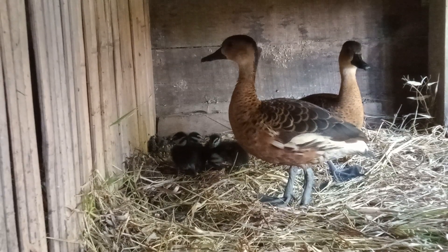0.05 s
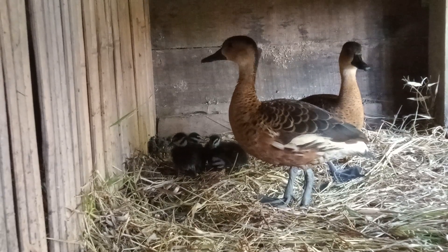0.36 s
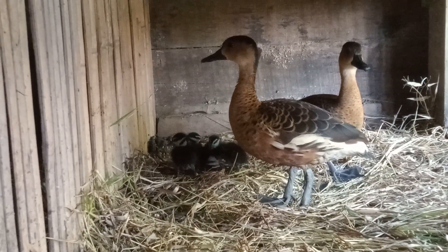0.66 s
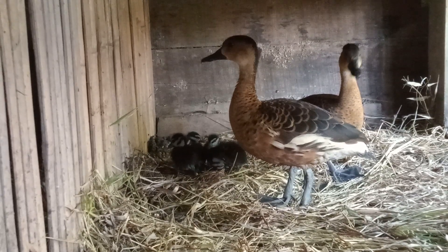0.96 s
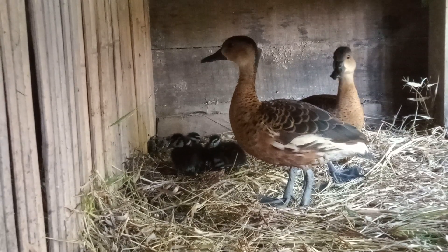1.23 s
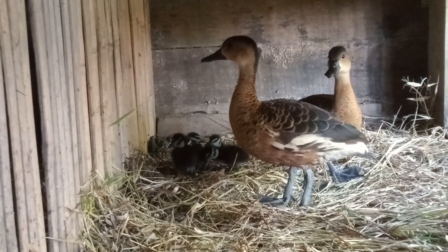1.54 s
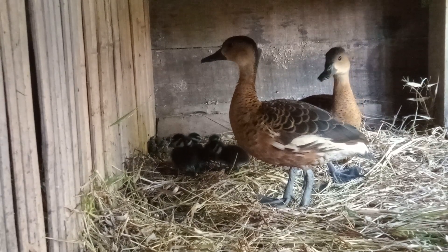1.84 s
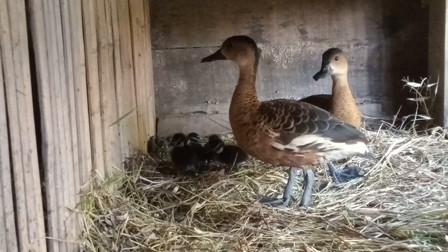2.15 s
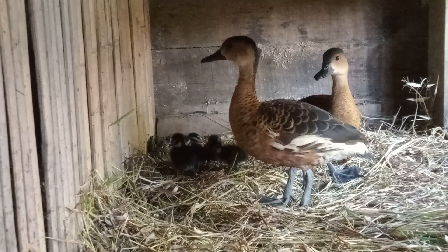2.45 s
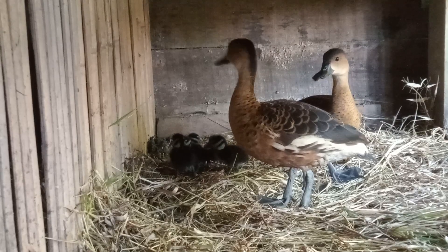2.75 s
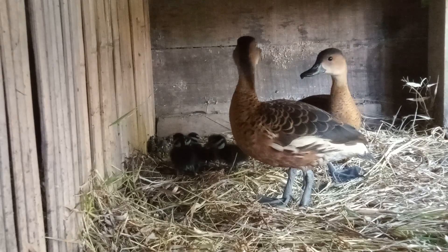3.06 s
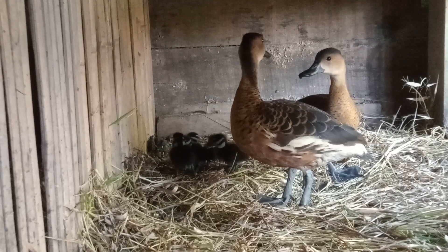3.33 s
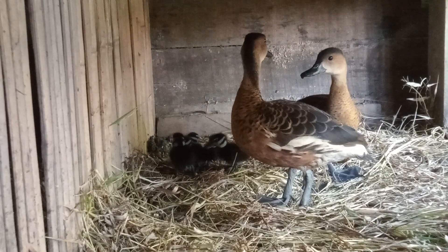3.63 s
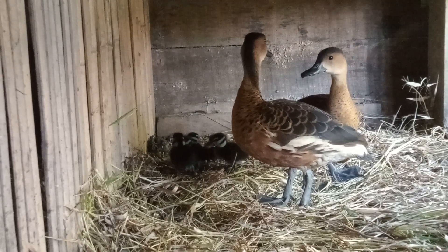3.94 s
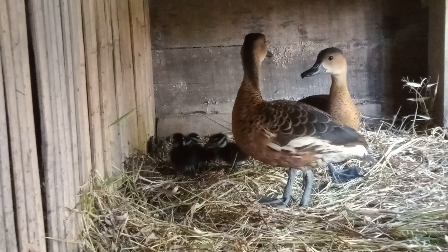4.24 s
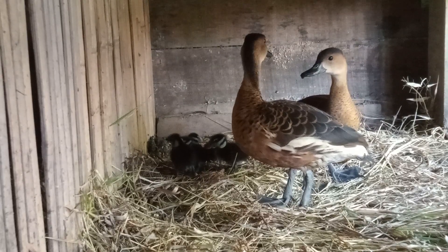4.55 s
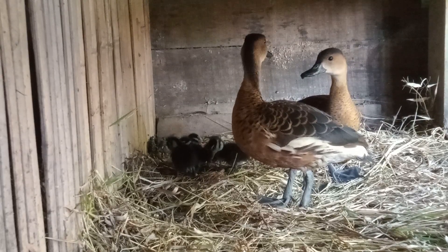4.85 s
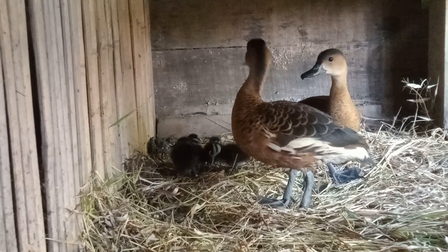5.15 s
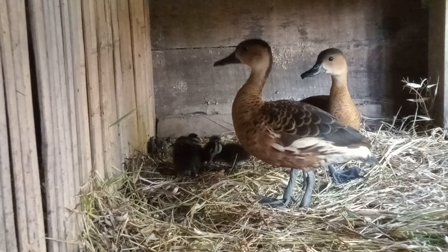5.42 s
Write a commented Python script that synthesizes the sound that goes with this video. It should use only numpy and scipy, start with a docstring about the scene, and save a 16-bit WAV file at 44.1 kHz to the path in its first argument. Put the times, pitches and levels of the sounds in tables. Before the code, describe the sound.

Ducks give short raspy whistles and ducklings peep inside a wooden hutch, with soft knocks on the boards.

```python
"""Whistling ducks call with their ducklings inside a wooden hutch bedded with straw.
Each call is a gliding harmonic tone from the syrinx, roughened by modulation and hiss: short raspy
whistles from the ducks, thin high peeps and bouts of twitter from the ducklings. Reflections from the
plank walls smear them into a ringing tail. Soft knocks excite the modes of the boards; a few low notes,
a far bird's whistles and one close, nearly dry chirp stand over a faint outdoor hush."""
import sys
import numpy as np
from scipy import signal
from scipy.fft import rfft, irfft
from scipy.io import wavfile
from scipy.ndimage import map_coordinates

SR = 44100
rng = np.random.default_rng(int(sys.argv[2]) if len(sys.argv) > 2 else 0)


def generate_wav(sig):
    """Save sig (samples, or channels by samples) to the path in sys.argv[1] as 16-bit PCM at SR."""
    pcm = np.round(np.clip(np.atleast_2d(sig).T, -1, 1) * 32767).astype(np.int16)
    wavfile.write(sys.argv[1], SR, pcm)


N = 250929


def undb(db):
    """Amplitude ratio of a level in decibels."""
    return 10 ** (np.asarray(db) / 20)


def gain_at(hz, spectrum):
    """Gain of a spectrum (frequency_hz, level_db), interpolated on a logarithmic frequency axis."""
    corners_hz, db = np.transpose(spectrum)
    return undb(np.interp(np.log(np.maximum(hz, 1)), np.log(corners_hz), db))


def noise(size, spectrum):
    """Spectral shaping: white noise filtered to a spectrum and scaled to rms 1."""
    white = rfft(rng.standard_normal(size))
    shaped = irfft(white * gain_at(np.fft.rfftfreq(size, 1 / SR), spectrum), size)
    return shaped / np.sqrt(np.mean(shaped ** 2))


def wander(size, rate_hz):
    """Random modulator: a spline through Gaussian values, with a spread near 1."""
    steps = np.arange(size) / SR * rate_hz
    return map_coordinates(rng.standard_normal(int(steps[-1]) + 2), [steps], order=3, mode="nearest")


def add(track, start_s, sound):
    """Superposition: a sound sums into the track from its start time."""
    i = max(int(start_s * SR), 0)
    track[i:i + len(sound)] += sound[:max(N - i, 0)]


def arch(length_s, start_hz, middle_hz, end_hz, edges_s):
    """Parabolic pitch contour and cosine-tapered envelope of one note."""
    progress = np.linspace(0, 1, int(max(length_s, .005) * SR))
    hz = np.polyval(np.polyfit([0, .5, 1], [start_hz, middle_hz, end_hz], 2), progress)
    return hz, np.sqrt(2) * signal.windows.tukey(len(hz), np.clip(edges_s / length_s, 0, 1))


def hush(level_db=-50, waver_db=3.5):
    """Outdoor ambient noise: steady hiss above a rumble under random amplitude modulation."""
    # spectral density of the background: frequency_hz, relative_db
    air_spectrum = [(24, -62), (40, -12.5), (108, 3), (202, -4), (350, -11.5), (449, -8), (621, -14.5),
                    (778, -14), (1310, -21), (2270, -15.5), (3740, -13), (5860, -35.5), (7710, -37),
                    (9650, -26), (15500, -55)]
    air = noise(N, air_spectrum) * undb(level_db)
    rumble = signal.sosfiltfilt(signal.butter(2, 600, fs=SR, output="sos"), air)
    return rumble * undb(waver_db * wander(N, 15)) + (air - rumble)


def knocks(body_db=-4, body_t60_s=0.3, ring_db=-2, ring_t60_s=0.18, boom_db=6.5, boom_rise_s=0.023):
    """Damped vibration: a soft blow excites a hollow note and dense modes; low modes build up later."""
    # blows on the boards: start_s, blow_db, low_modes_db, ring_hz, rise_s
    blows = [(0.19, -30.5, -37, 358, .014), (0.475, -42, -60, 406, 0.0095),
             (0.569, -26.5, -38.5, 555, .018), (0.926, -28.5, -35.5, 451, .012),
             (1.285, -29.5, -40, 324.4, 0.011), (1.726, -31, -39.5, 478, .006),
             (2.05, -32, -45.5, 518, 0.0058), (2.39, -32.5, -46, 399, .006), (2.499, -32.5, -37, 325, .015),
             (2.951, -24, -39, 670, 0.0099), (3.28, -31, -38.5, 448, .012),
             (3.682, -28.5, -38.5, 690, .012), (3.903, -30.5, -46, 415.4, .012),
             (4.057, -34, -41, 433, 0.0076), (4.716, -34, -43, 548, 0.0083),
             (5.045, -29.5, -43, 551, 0.0085)]
    # low modes of the boards: frequency_hz, relative_db, t60_s
    board_modes = [(66, -11, 0.39), (116.5, -6.5, 0.57), (153, -7, 0.34), (216, 0, 0.31)]
    # spectrum of the dense modes: frequency_hz, relative_db
    body_spectrum = [(150, -28), (260, -2.5), (420, -4), (600, -3.5), (850, -8.5), (1250, -14),
                     (3800, -15.5), (6400, -47.5), (9700, -27), (14000, -47)]
    out, t = np.zeros(N), np.arange(SR // 2) / SR
    for start_s, blow_db, low_modes_db, ring_hz, rise_s in blows:
        low_modes = np.zeros(len(t))
        for hz, db, t60_s in board_modes:
            detuned_hz = hz * (1 + 0.0464 * rng.standard_normal())
            low_modes += undb(db - 60 * t / t60_s) * np.sin(2 * np.pi * (detuned_hz * t + rng.random()))
        boom = undb(low_modes_db + boom_db) * (1 - np.exp(-t / boom_rise_s)) * low_modes
        body = noise(len(t), body_spectrum) * undb(body_db - 60 * t / body_t60_s)
        hollow = np.sin(2 * np.pi * ring_hz * t) * undb(ring_db - 60 * t / ring_t60_s)
        blow = undb(blow_db) * (1 - np.exp(-t / rise_s)) * (body + hollow)
        add(out, start_s - rise_s, blow + boom)  # a soft contact begins one rise time early
    return out


def clucks(wobble=0.066, flutter=0.4):
    """Brief low notes that sag in pitch, made unsteady by random frequency and amplitude modulation."""
    # low notes: start_s, pitch_hz, level_db, length_s
    low_notes = [(0.070, 115, -38, 0.083), (0.198, 219.3, -39.5, 0.085), (0.808, 556, -34.5, 0.03),
                 (2.495, 208.4, -38.5, 0.069), (2.621, 468, -49.5, 0.05)]
    out = np.zeros(N)
    for start_s, pitch_hz, level_db, length_s in low_notes:
        hz, swell = arch(length_s, 1.1 * pitch_hz, pitch_hz, 1.07 * pitch_hz, edges_s=length_s / 2)
        hz *= 1 + wobble * wander(len(hz), pitch_hz)
        swell *= 1 + flutter * wander(len(hz), 2 * pitch_hz)
        add(out, start_s, undb(level_db) * swell * np.sin(2 * np.pi * np.cumsum(hz) / SR))
    return out


def far_bird():
    """Pure tones: a bird outside whistles faint, gliding sinusoids."""
    # far whistles: start_s, length_s, start_hz, middle_hz, end_hz, level_db
    whistles = [ (3.15, 0.064, 1190, 1170, 1000, -54.5), (3.234, 0.071, 977, 950, 900, -54),
                (4.440, 0.1, 1555, 1500, 1410, -66), (5.082, 0.21, 1430, 1517, 1560, -60.5), ]
    out = np.zeros(N)
    for start_s, length_s, start_hz, middle_hz, end_hz, level_db in whistles:
        hz, swell = arch(length_s, start_hz, middle_hz, end_hz, edges_s=0.02)
        add(out, start_s, undb(level_db) * swell * np.sin(2 * np.pi * np.cumsum(hz) / SR))
    return out


def chirp(jitter=0.14, hold_s=0.01, rise_db_per_s=1700, fall_db_per_s=800, scoop_db=-24):
    """A harmonic series scoops up softly, is loud at the top and roughens with jitter as it falls."""
    # one sharp chirp close by: start_s, length_s, start_hz, middle_hz, end_hz, level_db
    note = (5.283, .062, 869, 1320, 1004, -27)
    # its partials, the second strongest: harmonic_number, relative_db
    harmonics = [(1, -16.5), (2, 1.5), (3, -17.5), (4, -19), (5, -37), (6, -37), (8, -24)]
    start_s, length_s, start_hz, middle_hz, end_hz, level_db = note
    hz, swell = arch(length_s, start_hz, middle_hz, end_hz, edges_s=0.0066)
    t = np.arange(len(hz)) / SR - length_s / 2  # zero at the middle of the note
    hz *= 1 + jitter * np.maximum(t, 0) / (length_s / 2) * wander(SR // 2, 1003)[:len(t)]
    phase = 2 * np.pi * np.cumsum(hz) / SR
    tone = sum(undb(db) * np.sin(k * phase) for k, db in harmonics)
    attack_db = np.clip(rise_db_per_s * (t + hold_s / 2), scoop_db, 0)
    decay_db = -fall_db_per_s * np.maximum(t - hold_s / 2, 0)
    out = np.zeros(N)
    add(out, start_s, swell * undb(level_db + attack_db + decay_db) * tone)
    return out


def syrinx(length_s, pitch_hz, glide_semitones, overtone_db, rasp, arch_semitones=1.122,
           trill_hz=56, trill_depth=0.1, tremor_hz=260, tremor=0.02396,
           jitter_hz=1100, jitter=0.1189, shimmer=0.53, rolloff_db=-2, hiss_db=-17):
    """Source and filter: a quivering harmonic glide; rasp (0-1) adds trill, jitter, shimmer and hiss."""
    # filter that the overtones pass through: frequency_hz, gain_db
    overtone_filter = [(5000, -1), (6000, -8.5), (7200, -14), (8500, -7.5), (9700, 1), (11000, -6),
                       (13000, -12.5), (15500, -30)]
    # hiss of a forced call: frequency_hz, relative_db
    hiss_spectrum = [(1200, -37), (2500, 7), (4500, -14), (7000, -8.5), (9700, -20), (15000, -35)]
    longest = SR // 8
    bend = np.array([-glide_semitones / 2, arch_semitones, glide_semitones / 2]) - arch_semitones / 2
    hz, swell = arch(min(length_s, longest / SR), *(pitch_hz * 2 ** (bend / 12)), edges_s=0.011)
    n = len(hz)
    quiver, shake, flutter = (wander(longest, rate)[:n] for rate in (tremor_hz, jitter_hz, jitter_hz))
    trill = -np.cos(2 * np.pi * trill_hz * np.arange(n) / SR)
    hz *= 1 + tremor * quiver + rasp * (trill_depth * trill + jitter * shake)
    phase = 2 * np.pi * np.cumsum(hz) / SR
    tone = np.sin(phase) + rasp * undb(hiss_db) * noise(longest, hiss_spectrum)[:n]
    brightness = np.sqrt(swell / np.sqrt(2))  # overtones enter later and fade sooner
    for k in range(2, 7):
        gain = undb(overtone_db + rolloff_db * (k - 2)) * gain_at(k * hz, overtone_filter)
        tone += brightness * gain * (k * hz < SR / 2) * np.sin(k * phase)
    return swell * (1 + shimmer * rasp * flutter) * tone


def twitter(notes_per_s=30, scatter_s=0.0022, pitch_spread=.05, glide_semitones=2.5, spread_db=0.8):
    """Quasi-periodic trains of soft duckling notes, varying at random in time, pitch, glide and level."""
    # bouts of twitter: start_s, end_s, pitch_hz, level_db
    bouts = [(0, .16, 3885, -46.5), (0.218, .28, 3750, -37), (1.161, 1.21, 3260, -38.5),
             (2.875, 2.94, 4400, -34), (3.378, 3.5, 2716, -34.5), (5.06, 5.17, 4487, -40)]
    out = np.zeros(N)
    for start_s, end_s, pitch_hz, level_db in bouts:
        for onset_s in np.arange(start_s, end_s, 1 / notes_per_s):
            late, high, slide, loud = rng.standard_normal(4)
            note = syrinx(length_s=.04, pitch_hz=pitch_hz * np.exp(pitch_spread * high),
                          glide_semitones=glide_semitones * slide, overtone_db=-4, rasp=0.566)
            add(out, onset_s + scatter_s * late, undb(level_db + spread_db * loud) * note)
    return out


def peeps(length_s=0.0352):
    """Nearly periodic vibration of a duckling's syrinx gives a thin peep with a strong octave."""
    # ducklings' peeps: start_s, pitch_hz, level_db
    calls = [(0.281, 4380, -36.5), (0.81, 6010, -35), (1.059, 4780, -49), (2.886, 6100, -41),
             (3.0, 4570, -39), (3.202, 4740, -31), (3.298, 4760, -22), (3.344, 4680, -28),
             (4.634, 6290, -36.5), (4.868, 5000, -38), (5.048, 4720, -36), (5.175, 4840, -39)]
    out = np.zeros(N)
    for start_s, pitch_hz, level_db in calls:
        peep = syrinx(length_s, pitch_hz, glide_semitones=0.49, overtone_db=1.5, rasp=0.264)
        add(out, start_s, undb(level_db) * peep)
    return out


def ducks():
    """Whistles glide up or down; deeper modulation makes the softer calls rougher."""
    # ducks' whistles: start_s, length_s, pitch_hz, glide_semitones, level_db, overtone_db
    calls = [ (0.175, 0.083, 3034, -0.5, -34, -6.5), (0.711, 0.051, 2935, 1, -25.5, -13),
             (0.728, 0.051, 4486, 4, -24, -7), (0.764, 0.047, 4225, -2.5, -20.5, -14),
             (0.887, 0.082, 3945, 1.5, -20, -17), (0.906, 0.05, 3193, 2, -21.5, -18.5),
             (1.161, 0.081, 2366, -0.5, -35, -1), (1.222, 0.039, 3785, -3, -24, -16.5),
             (1.274, .043, 3422, -4, -26.5, -12), (2.686, 0.042, 3540, -4.5, -27, -22.5),
             (2.826, .062, 2950, -4, -34.5, -25), (2.9, 0.051, 3420, -10, -26, -6),
             (2.939, 0.061, 3400, 2.5, -22, -19), (3.063, .041, 3804, -6.5, -27, -10),
             (3.089, 0.06, 2675, 0.5, -23.5, -7.5), (3.11, 0.06, 3566, -4, -23, -8.5),
             (3.153, 0.044, 2290, -2, -34, 3), (3.184, .049, 3994, 0.5, -26.5, -5),
             (3.277, 0.034, 3057, 0, -28, -14), (3.3, .06, 3823, -4.5, -21, -3),
             (3.38, 0.063, 3994, 0.5, -30.5, -19), (3.451, .068, 3730, 5.5, -28.5, -3),
             (3.512, 0.069, 3395, 6.5, -23, -17), (3.621, 0.031, 2926, 2, -28, -18),
             (4.053, 0.036, 3008, 1, -34, -13), (4.299, 0.069, 4500, -8, -32.5, -3.5),
             (4.325, .062, 3126, 8, -31, -8.5), (4.856, 0.0318, 2396, 0.5, -34.5, -6.5),
             (4.906, 0.053, 3140, 5, -29, -17), (4.952, 0.07, 2370, 3.5, -33.5, -3.5),
             (4.954, 0.06, 3834, 3, -32, -7.5), (5.127, 0.051, 3330, 2.5, -30.5, -7)]
    # soft calls are scratchy, loud ones hold their tone: level_db, rasp
    rasp_by_level = [(-33.5, .95), (-31, 0.79), (-26.5, 0.55), (-21.5, 0.43)]
    # the lowest whistles stay cleaner: pitch_hz, share_of_rasp
    share_by_pitch = [(2350, .3), (2900, 0.63), (3050, 1)]
    out = np.zeros(N)
    for start_s, length_s, pitch_hz, glide_semitones, level_db, overtone_db in calls:
        rasp = np.interp(level_db, *np.transpose(rasp_by_level))
        rasp *= np.interp(pitch_hz, *np.transpose(share_by_pitch))
        add(out, start_s, undb(level_db) * syrinx(length_s, pitch_hz, glide_semitones, overtone_db, rasp))
    return out


def hutch(sound, direct_db, walls_db, t60_s=0.29, treble_t60_s=0.22, build_s=0.0011):
    """Reverberation: close plank walls return a dense tail at once, and its treble decays sooner."""
    t = np.arange(SR // 2) / SR
    echoes = rng.standard_normal(len(t))
    low = signal.sosfiltfilt(signal.butter(2, 6000, fs=SR, output="sos"), echoes)
    tail = low * undb(-60 * t / t60_s) + (echoes - low) * undb(-60 * t / treble_t60_s)
    tail *= 1 - np.exp(-t / build_s)
    reflected = signal.fftconvolve(sound, tail / np.linalg.norm(tail))[:N]
    return undb(direct_db) * sound + undb(walls_db) * reflected


def scene():
    """Direct-to-reverberant ratio sets depth: the ducks are far inside, the other notes almost dry."""
    around = knocks() + hush()
    in_front = hutch(far_bird() + chirp() + clucks(), direct_db=0, walls_db=-20)
    inside = hutch(ducks() + peeps() + twitter(), direct_db=-7, walls_db=-1.5)
    return (inside + in_front + around)[None]


def record(dry):
    """Band limiting: a steep low-pass filter removes the highest treble."""
    cutoff_hz = 15600
    return signal.sosfilt(signal.ellip(10, .2, 70, cutoff_hz, fs=SR, output="sos"), dry)


dry = scene()
out = record(dry)
generate_wav(out)
```